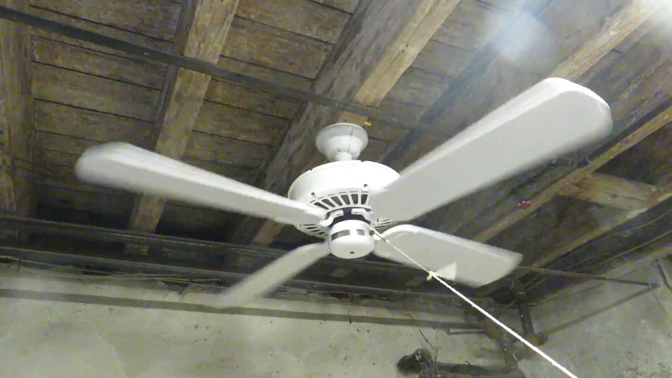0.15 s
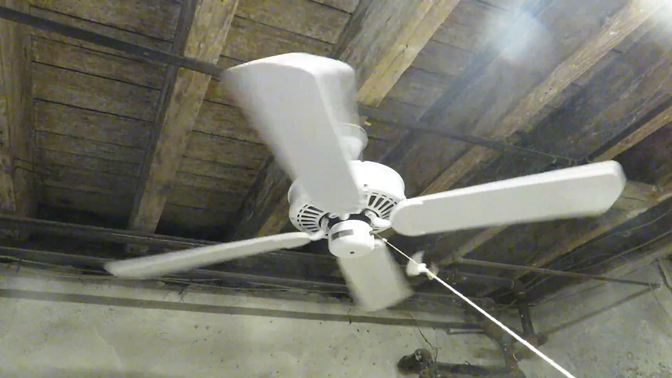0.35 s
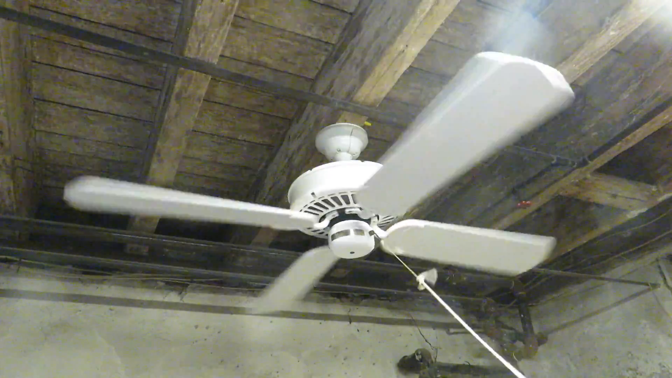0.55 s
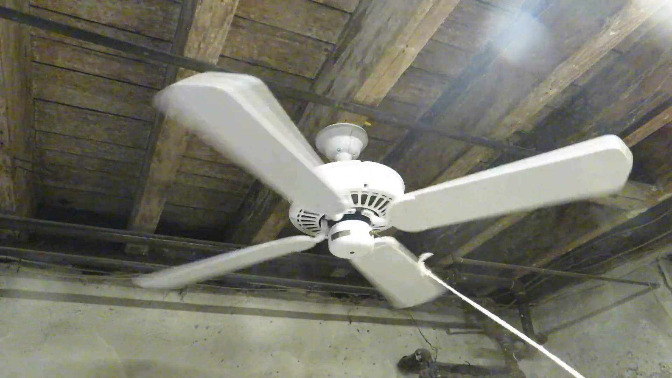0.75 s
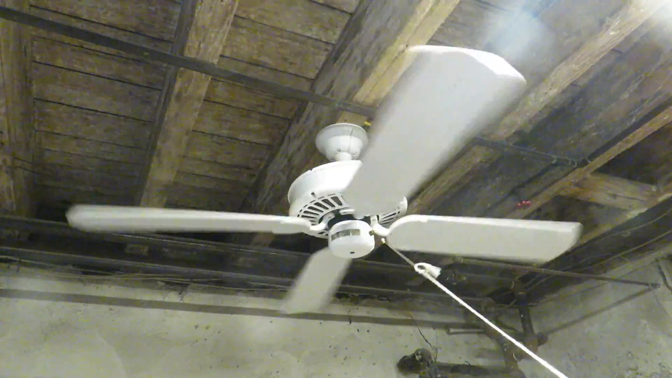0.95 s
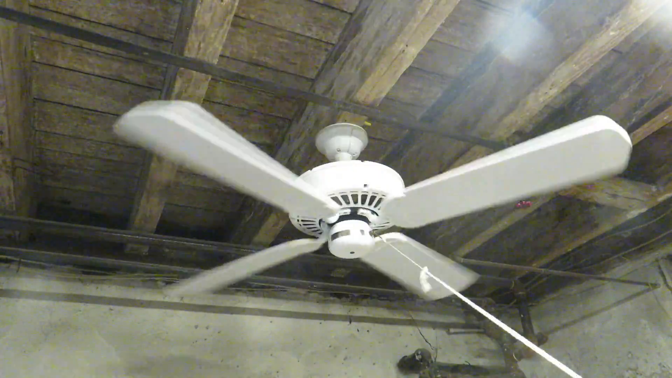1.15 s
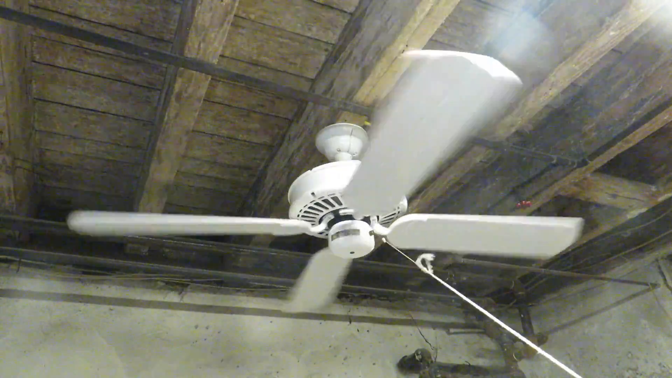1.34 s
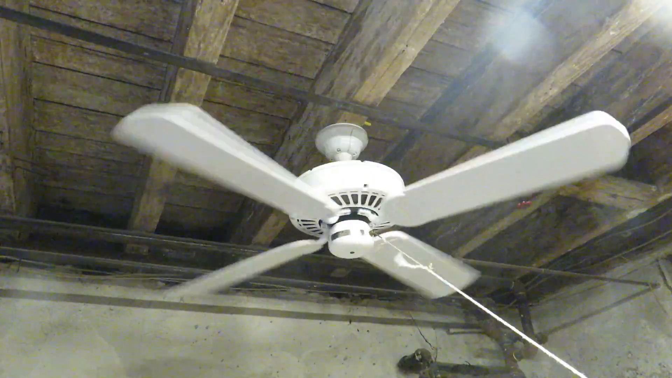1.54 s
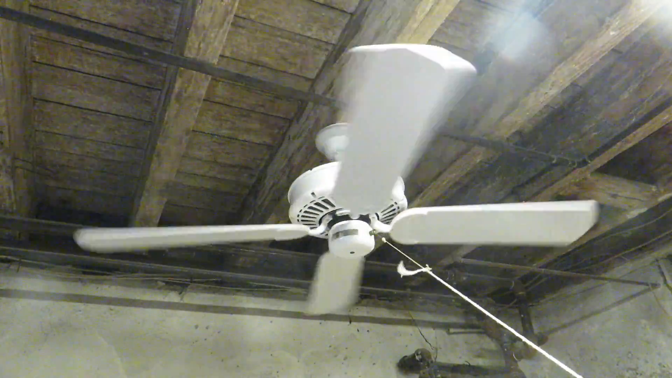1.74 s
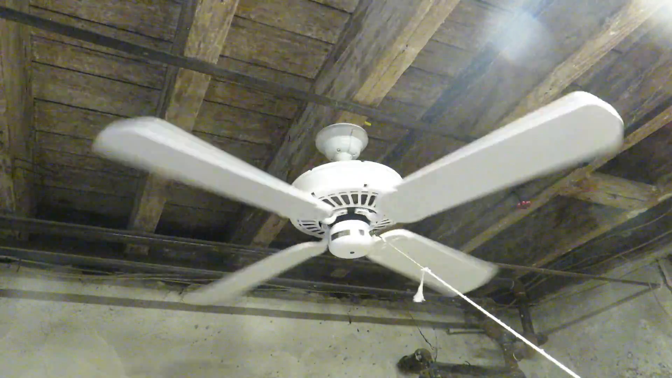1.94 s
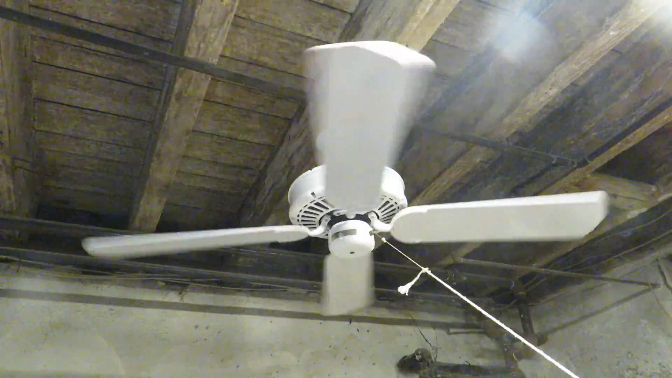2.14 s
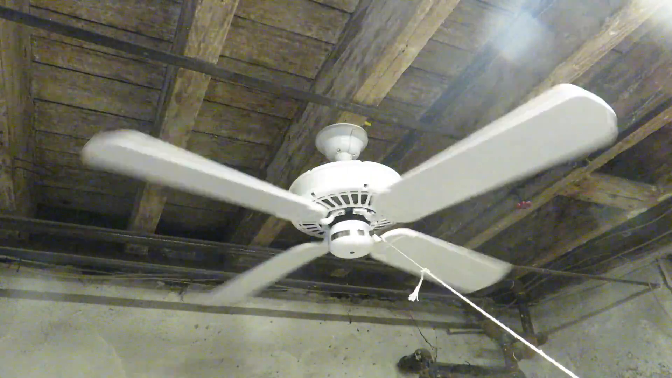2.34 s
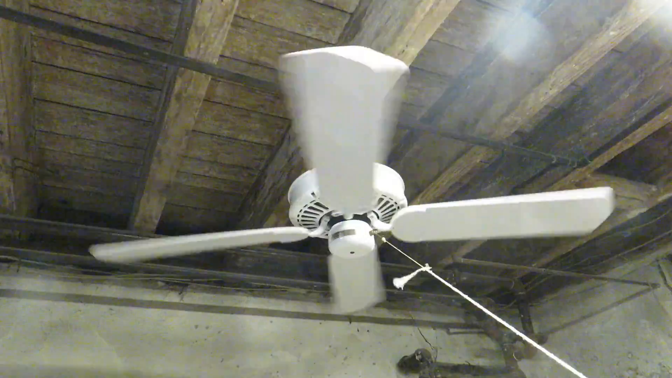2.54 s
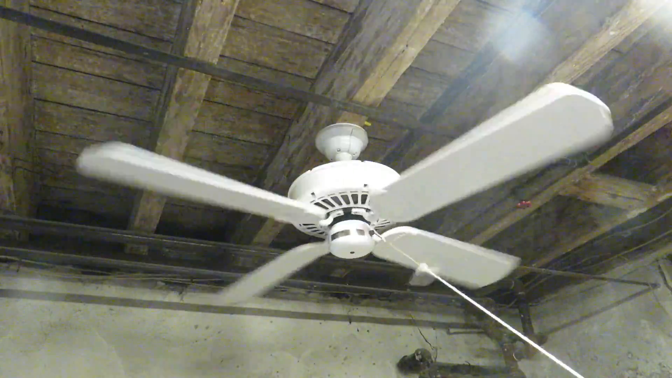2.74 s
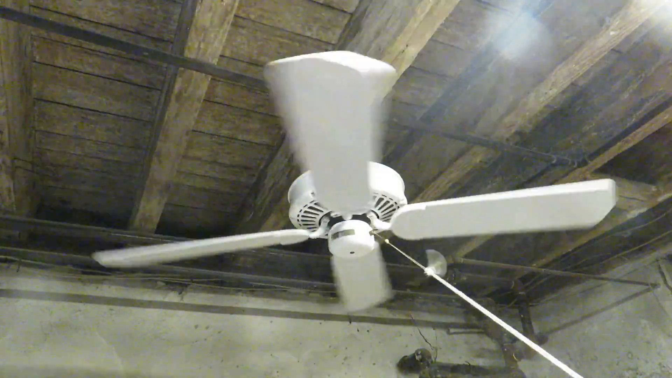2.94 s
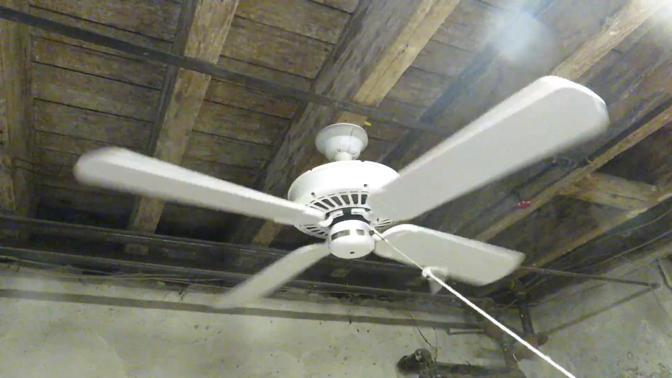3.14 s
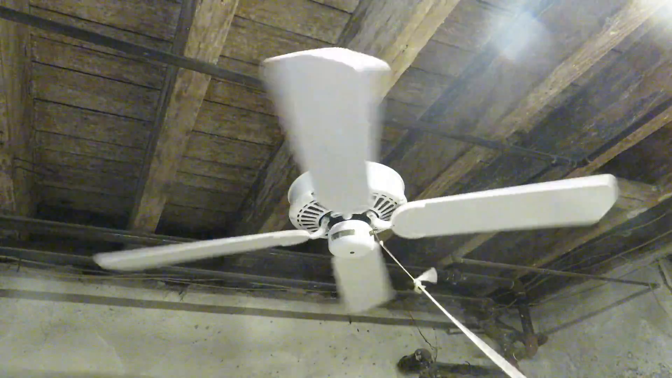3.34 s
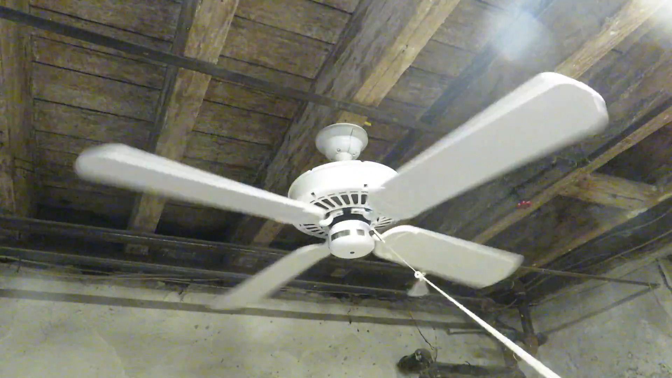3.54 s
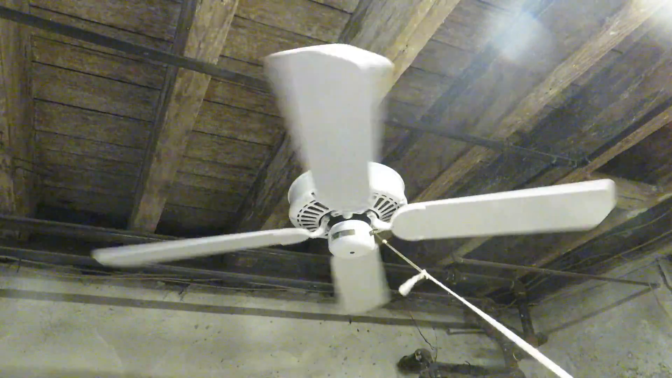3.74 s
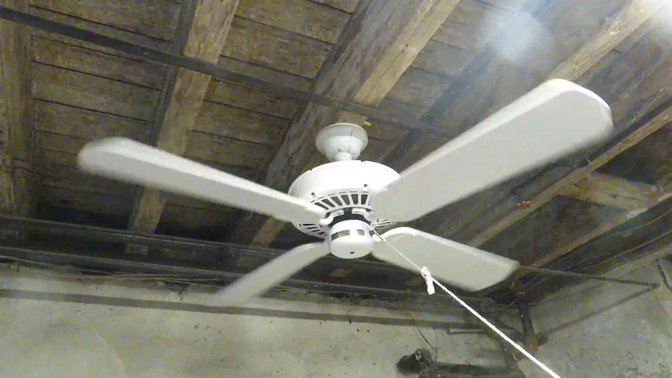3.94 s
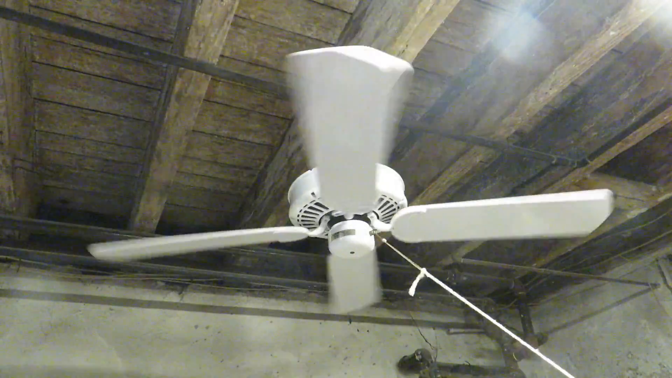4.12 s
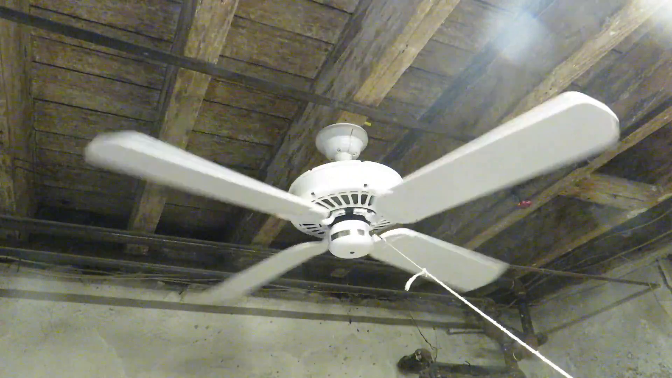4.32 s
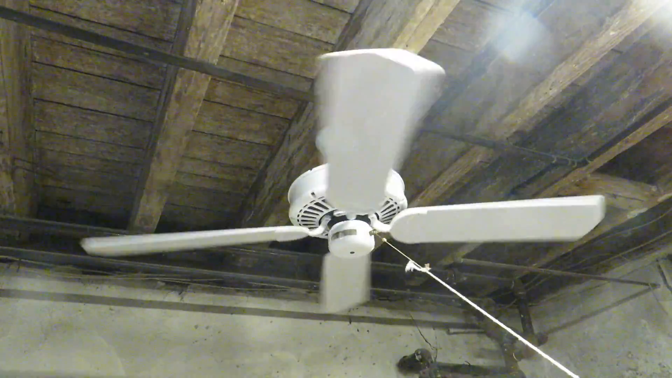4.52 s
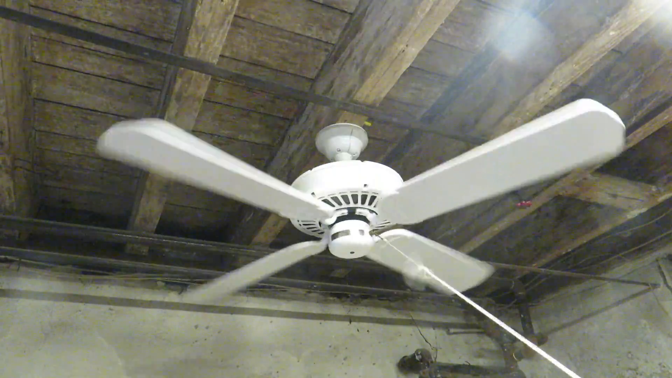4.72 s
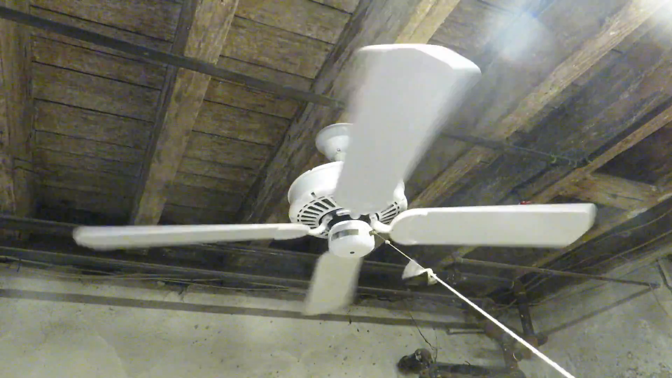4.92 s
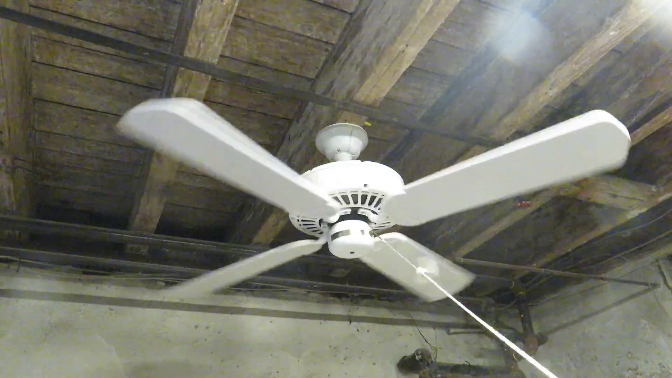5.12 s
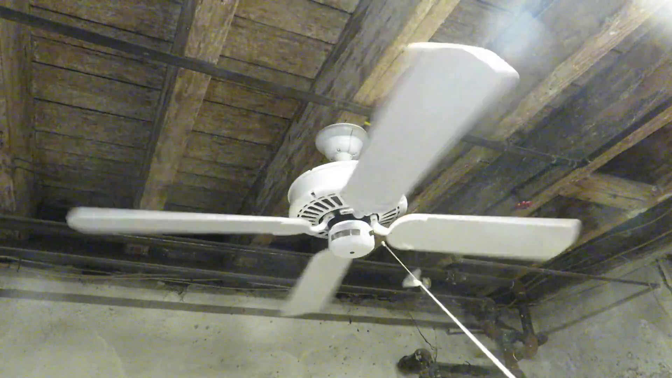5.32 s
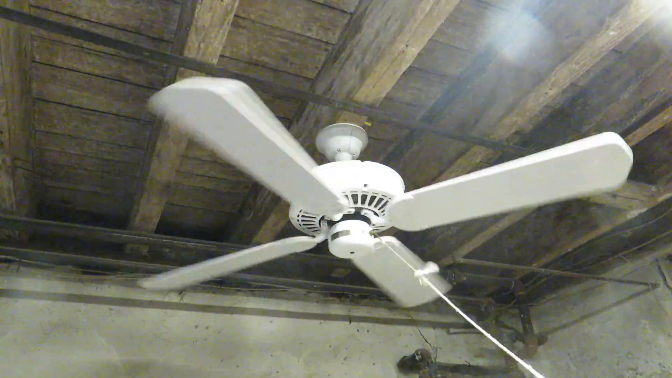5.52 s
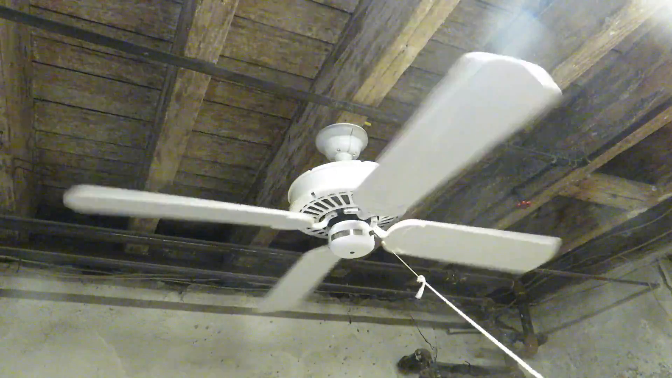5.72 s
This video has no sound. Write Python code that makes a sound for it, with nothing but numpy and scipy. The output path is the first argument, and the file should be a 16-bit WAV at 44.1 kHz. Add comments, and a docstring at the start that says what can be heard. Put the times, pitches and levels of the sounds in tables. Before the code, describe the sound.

A fan pull chain snaps loudly three times in a bare room, each snap answered by a smaller ticking click-back, with quiet rumble beneath.

```python
"""Three tugs on a ceiling fan's pull chain clack and jingle in a bare cellar room.
In each tug the chain goes taut, the switch snaps over, then the ratchet ticks back tooth by tooth.
Short noise bursts and damped notes make the blows; sums of fading sine tones make the parts ring.
Fading stereo noise makes the room's brief answer; shaped noise makes the rumble, hiss and chain rustle."""
import sys
import numpy as np
from scipy import signal
from scipy.fft import rfft, irfft
from scipy.io import wavfile
from scipy.ndimage import uniform_filter1d

SR = 44100
rng = np.random.default_rng(int(sys.argv[2]) if len(sys.argv) > 2 else 0)


def digitize_waveform(pressure):
    """Quantize a signal to 16-bit integers and store it at the path in sys.argv[1].

    Rows of a 2-D input are taken as channels; values are limited to [-1, 1].
    """
    field = np.atleast_2d(pressure).T
    bounded = np.clip(field, -1, 1)
    quanta = np.round(bounded * 32767).astype(np.int16)
    wavfile.write(sys.argv[1], SR, quanta)


N = 258867  # length in samples


def undb(db):
    """Turn a level in dB into a plain multiplier."""
    return 10 ** (np.asarray(db) / 20)


def read(table, hz):
    """Look up a (f/Hz, value) table, joining its points by lines on a log-frequency axis."""
    f, v = np.transpose(table)
    return np.interp(np.log(np.maximum(hz, 1)), np.log(f), v)


def colour(x, table):
    """Make each frequency louder or softer by a (f/Hz, level/dB) table."""
    hz = np.fft.rfftfreq(x.shape[-1], 1 / SR)
    return irfft(rfft(x) * undb(read(table, hz)), x.shape[-1])


def stereo_noise(size, likeness):
    """Make left and right noise by mixing a shared and an opposed part to set their likeness."""
    c = np.clip(read(likeness, np.fft.rfftfreq(size, 1 / SR)), -.99, .99)
    shares = np.sqrt([(1 + c) / 2, (1 - c) / 2])
    mid, side = rfft(rng.standard_normal((2, size))) * shares
    return irfft([mid + side, mid - side], size)


# how alike the two sides of the background are: (f/Hz, left-right correlation)
FLOOR_LIKENESS = [(60, 1), (130, 0.61), (290, -0.15), (640, -0.41), (1410, -0.047), (3100, 0.091),
                  (6820, -0.011), (15000, 0.27)]
# tone balance of rumble and hiss: (f/Hz, relative level/dB per Hz)
FLOOR_COLOUR = [(15, -3.5), (25, -8.5), (38, -21.5), (58, 0), (86, -9), (230, -9), (410, -9), (900, -13),
                (4670, -23), (9000, -31.5), (13900, -40.5), (16000, -52)]
FLOOR_DB = -53.5  # average level of the two sides mixed, before the swell


def floor():
    """Smooth hiss of the two microphones over a distant rumble; their shared level drifts a little."""
    noise = colour(stereo_noise(N, FLOOR_LIKENESS), FLOOR_COLOUR)
    k = SR // 4  # a new random level every quarter second, joined by slopes
    levels = np.repeat(rng.standard_normal(N // k + 1), k)
    swell = uniform_filter1d(levels, k)[:N]
    loudness = np.sqrt(np.mean(noise.mean(axis=0) ** 2))
    return noise / loudness * undb(FLOOR_DB + 0.45 * swell)


def fading_bursts(events):
    """Loudness curve of (t/s, level/dB, fade time/s) events: each starts at once and dies away."""
    t = np.arange(N) / SR
    return sum(undb(db) * (t > s) * np.exp(-np.abs(t - s) / fade) for s, db, fade in events)


# the slack chain sways: (t/s, level/dB before colouring, fade time/s)
RUSTLES = [(1.707, -54.5, 0.042), (1.873, -56, 0.016), (4.133, -56, 0.02)]
# tone balance of the rustling beads: (f/Hz, level/dB)
RUSTLE_COLOUR = [(600, -27), (1500, 8), (3000, 9), (6000, 0.5), (10000, -25)]


def slack_chain():
    """Soft bead noise between the tugs: each rustle starts at once and dies away."""
    return colour(fading_bursts(RUSTLES) * rng.standard_normal(N), RUSTLE_COLOUR)


# how long the room answers: (f/Hz, time to fall by 60 dB/s)
ECHO_T60 = [(300, 0.37), (1500, 0.29), (4000, 0.24), (8000, 0.18), (14000, 0.088)]
# how alike the two sides of the echo are: (f/Hz, left-right correlation)
ECHO_LIKENESS = [(300, 0.94), (1500, 1), (4000, 0.83), (8000, 0.36), (14000, 0.037)]


def echo():
    """Room response: noise dying away band by band, faster in the treble."""
    size = SR // 2
    t, f = np.arange(size) / SR, np.fft.rfftfreq(size, 1 / SR)
    spectrum, out = rfft(stereo_noise(size, ECHO_LIKENESS)), 0
    for hz in 125 * 2. ** np.arange(8):  # overlapping bands, one octave apart
        band = np.maximum(1 - np.abs(np.log2(np.maximum(f, 1) / hz)), 0)
        fade = undb(-60 * t / read(ECHO_T60, hz))
        out = out + irfft(spectrum * band, size) * fade
    return out * (1 - np.exp(-t / 0.0029))  # the echo builds up over a few milliseconds


SCATTER_DB = 2  # chance in how hard each tone is struck


def ring(modes, rise_s, smear_hz, lean_db):
    """A struck part's tones: the shock needs rise_s to spread, loose joints blur each by smear_hz."""
    t = np.arange(SR // 2) / SR
    hz, db, t60 = np.transpose(modes)[:, :, None]
    lean = lean_db * np.linspace(-.5, .5, len(modes))
    struck_db = lean + SCATTER_DB * rng.standard_normal(len(modes))
    gain = undb(db + struck_db[:, None]) / np.sum(undb(db))
    # a random walk in phase blurs the pitch
    steps = rng.standard_normal((len(modes), len(t)))
    slip = np.sqrt(2 * np.pi * abs(smear_hz) / SR) * np.cumsum(steps, axis=1)
    tones = np.sin(2 * np.pi * hz * t + slip) * undb(-60 * t / t60)
    return (1 - np.exp(-t / rise_s)) * np.sum(gain * tones, axis=0)


# starts of each pull and each release: (t/s)
PHASES_S = [0, .3, 2.8, 3.15, 4.75, 5.08]


def shake(force, modes, rise_s, smear_hz, leans_db=np.zeros(len(PHASES_S))):
    """A part rings under a force, a little differently in each pull and release."""
    out, edges = np.zeros(N + SR), [int(s * SR) for s in PHASES_S] + [N]
    for a, b, lean_db in zip(edges, edges[1:], leans_db):
        part = signal.fftconvolve(force[a:b], ring(modes, rise_s, smear_hz, lean_db))
        out[a:a + len(part)] += part
    return out[:N]


# tones of each part: (f/Hz, level/dB within the part, time to fall by 60 dB/s)
BEAMS = [(78.5, -7.5, 0.64), (98.3, -6, 0.66), (141.2, -3.5, 0.42), (185.7, -4.5, 0.29), (221, -2.5, 0.5)]
ROD = [(341.2, 4, 0.25)]
BLADES = [(271, -1, 0.24), (289, 10, 0.096), (302.7, 3, 0.18)]
HOUSING = [(757, -1.5, 0.15), (791.8, 3.5, 0.11), (816.4, 3.5, 0.16), (854.7, 0, 0.13), (932, -8.5, 0.092)]
CAP = [(559, -6.5, 0.16), (608, -5.5, 0.18), (660, 4.5, 0.1), (670, -0.5, 0.098), (697, 0, 0.16)]
CHAIN = [(4520, -2.5, 0.066), (5166, 6, 0.073), (5450, 4.5, 0.066), (6000, 0, 0.053), (6330, 1.5, 0.075),
         (6870, 10.5, 0.014), (7920, -2, 0.06), (10840, -15, 0.031), (10840, -3.5, .03), (13260, -3, 0.032)]
SWITCH = [(1321, -3, 0.061), (1620, -14, 0.043), (1884, 0, 0.16), (1956, 1.5, 0.11), (2110, 6, 0.039),
          (2300, -5, 0.071), (2640, -1, 0.042), (2887, 1.5, 0.085), (2880, -1, 0.082), (3220, -3, 0.09),
          (3454, 0, 0.13), (3460, -4, 0.11), (3640, -1.5, 0.096), (4180, 1.5, 0.071)]
# each pull and release strikes at its own angle, adding level from first to last tone:
# (housing level/dB, beams level/dB, blades level/dB)
LEANS = [(4, -4.5, 2.5), (12, -1, 5), (-3.5, 2, -3.5), (9, 2, 1), (0, 0, 5.5), (4, -2, -1)]
WOBBLE_DB, WOBBLE_S = 2, 0.018  # drift before its second smoothing, and smoothing time


def ringing_parts(tick, jingle, push):
    """Blows set the switch, chain, cap, motor housing, blades, beams and hanging rod ringing."""
    # loose parts touch the ringing switch, so its tones flutter; the chain shares the flutter
    flutter = 1 + 4.6 * uniform_filter1d(rng.standard_normal(N), size=64)
    # the shaken fan swings on its hanger, so the body tones come and go
    k = int(WOBBLE_S * SR)
    drift = uniform_filter1d(uniform_filter1d(rng.standard_normal((4, N)), k), k)
    wobble = undb(WOBBLE_DB * np.sqrt(k) * drift)
    housing_lean, beams_lean, blades_lean = np.transpose(LEANS)
    # after each part's tones: rise time (s), then blur (Hz)
    return (undb(7.5) * flutter * shake(tick, SWITCH, 0.001, 44.0)
            + undb(5.0) * flutter * shake(jingle, CHAIN, 0.00028, 126.0)
            + undb(4.0) * wobble[0] * shake(push[0], CAP, 0.0044, 5.)
            + undb(9.0) * wobble[1] * shake(push[1], HOUSING, 0.011, 3.5, housing_lean)
            + undb(6.5) * wobble[2] * shake(push[2], BLADES, 0.011, 2.0, blades_lean)
            + undb(8.5) * wobble[3] * shake(push[3], BEAMS, 0.047, 6.0, beams_lean)
            + undb(6.0) * shake(push[4], ROD, 0.044, 2.4))


# beads strike the guide tube: (t/s, level/dB before colouring)
GLINTS = [(0.0708, -21), (2.9190, -50), (4.8570, -43), (4.861, -16.5), (4.863, -24)]
# tone balance of these bright ticks: (f/Hz, level/dB)
GLINT_COLOUR = [(7000, -25), (10500, 3), (13000, 2), (16000, -20)]
GLINT_S = 0.00086  # fade time


def glints():
    """Very short bright noise ticks inside the pulls, as beads strike the guide tube."""
    burst = fading_bursts([(s, db, GLINT_S) for s, db in GLINTS])
    return colour(burst * rng.standard_normal(N), GLINT_COLOUR)


BOUNCE_DB, BOUNCE_S, BOUNCE_PER_S = -21.5, 0.022, 290  # chain beads: level, fade time, average rate
CLUMP_DB, CLUMP_S = 2.5, .0012  # uneven knots in the rattle: spread and size


def rattle_shock(t, length, noise, dice):
    """One metal rattle: uneven noise grains die away while chain beads chatter on at random."""
    sign, size, lump = noise
    bite = 1 - np.exp(-t / 0.0007)  # contact builds over a fraction of a millisecond
    knot = max(int(CLUMP_S * SR), 1)
    clumps = CLUMP_DB * np.sqrt(knot) * uniform_filter1d(lump, knot)
    grains = bite * sign * undb(2.0 * size + clumps) * np.exp(-t / max(length, 1 / SR))
    hits = (dice < BOUNCE_PER_S / SR) * np.sqrt(SR / BOUNCE_PER_S)
    beads = hits * sign * undb(BOUNCE_DB) * np.exp(-t / BOUNCE_S)
    return (grains + beads) / np.sqrt(np.sum(grains ** 2))


def pawl_clack(t, hz, t60):
    """The pawl itself: two heavily damped notes, the upper dying first."""
    bite = 1 - np.exp(-t / 0.0007)
    upper = 0.97 * np.exp(-t / 0.0027) * np.sin(2 * np.pi * hz * 1.144 * t)
    return undb(-60 * t / t60) * bite * (np.sin(2 * np.pi * hz * t) + upper)


# tone balance of the rattle: (f/Hz, level/dB)
SNAP_COLOUR = [(400, -7.5), (1000, -5), (2000, -24.5), (3200, -9), (7000, -1), (9000, -5.5), (13000, -3),
               (15500, -11)]
# steps of a tug, levels before mixing: (t/s, click level/dB, clack f/Hz, clack level/dB,
# then push level/dB on chain, motor housing, switch cap, blades, hanging rod)
TAUT = [(0.003, -42.5, 3500, -55, -46, -36, -46, -44, -50),
        (2.8440, -49, 2770, -48, -40, -40, -47, -42.5, -58),
        (2.8488, -33.5, 2870, -41.5, -40, -33.5, -39, -40, -51),
        (4.7946, -36, 3450, -37, -35.5, -32, -32, -35, -53)]
SNAPS = [(0.0687, -20.5, 2860, -32.5, -25.5, -43, -50, -30, -40),
         (0.0708, -23, 3330, -44, -26, -26, -35, -40, -42),
         (2.9171, -16.5, 2850, -29, -24.5, -49, -27.5, -32, -52),
         (2.9215, -33, 3430, -42, -31, -61, -47, -49, -52),
         (4.8550, -18, 2820, -26.5, -23, -33, -55, -27.5, -30)]
JOLTS = [(0.0792, -28, 3040, -21.5, -35, -41, -19, -25.5, -32.5),
         (2.9267, -19.5, 3540, -30, -50, -20, -43, -22, -34),
         (4.8615, -16, 2880, -19, -23, -18.5, -25, -18, -28)]
TICKS = [(0.3592, -31.5, 3510, -44.5, -54, -38.5, -63, -43, -46),
         (0.4010, -25.5, 3400, -40, -53, -29, -63, -49, -50),
         (0.4160, -32, 3740, -46, -46, -59, -53, -53, -48),
         (3.1908, -32.5, 3590, -47.5, -42, -36, -52, -39, -50),
         (3.2252, -24.5, 3500, -46, -37, -43, -44, -45, -50),
         (3.2365, -27, 3510, -35, -45, -35, -62, -49, -55),
         (5.1086, -33, 3540, -44, -36, -40, -45, -45, -49),
         (5.1560, -36, 3585, -43.5, -43, -38, -57, -54, -55),
         (5.1446, -24.5, 3490, -41, -31, -33.5, -51, -45, -50)]
HOMES = [(0.4258, -25, 3030, -13, -27.5, -33, -28, -35, -42.5),
         (3.2459, -29.5, 3010, -15, -26, -26, -22, -44, -35),
         (5.1661, -22.5, 2980, -23, -25.5, -21, -30.5, -44, -51)]
REBOUNDS = [(0.0820, -30, 3510, -23.5, -32, -25.5, -44, -34.5, -50),
            (0.4283, -29.5, 2990, -22, -35, -62, -42, -48, -58),
            (0.4440, -34, 3340, -26.5, -41, -43, -46, -46, -55),
            (3.2483, -24, 2900, -28, -46, -41.5, -43, -48, -49),
            (5.1690, -30, 2970, -21.5, -28, -50, -51, -37, -47)]
# chain goes taut, switch snaps over, pull hits its stop and shakes the fan,
# ratchet slips back tooth by tooth, pawl drops home, some blows bounce:
# (rows, rattle fade time/s, clack time to fall by 60 dB/s, switch and beams level/dB relative to click)
STAGES = [(TAUT, 0.0016, 0.028, -4.5, -6), (SNAPS, 0.0031, 0.022, -12, -26.5),
          (JOLTS, 0.0018, 0.0072, -4.5, -22), (TICKS, 0.0059, 0.06, -7, -17.5),
          (HOMES, 0.0012, 0.0076, -10, -28), (REBOUNDS, 0.0011, 0.012, -2.4, -45)]
# extra shake of the beams by each jolt: (level/dB)
CEILING_DB = [-33, -42, -41]


def pull_chain():
    """Every blow clacks, rattles metal on metal and pushes the parts of the fan and the ceiling."""
    t = np.arange(SR // 10) / SR
    rattle, clack, tick, jingle = np.zeros((4, N + len(t)))
    push = np.zeros((5, N))  # cap, housing, blades, beams, rod
    for rows, length, t60, switch_db, beams_db in STAGES:
        for s, db, hz, clack_db, chain_db, housing_db, cap_db, blades_db, rod_db in rows:
            i = int(s * SR)
            shock = rattle_shock(t, length, rng.standard_normal((3, len(t))), rng.random(len(t)))
            rattle[i:i + len(t)] += undb(db) * shock * np.sqrt(max(length, 1 / SR) * SR / 2)
            tick[i:i + len(t)] += undb(db + switch_db) * shock
            jingle[i:i + len(t)] += undb(chain_db) * shock
            clack[i:i + len(t)] += undb(clack_db) * pawl_clack(t, hz, t60)
            push[:, i] += undb([cap_db, housing_db, blades_db, db + beams_db, rod_db])
    for jolt, db in zip(JOLTS, CEILING_DB):
        push[3, int(jolt[0] * SR)] += undb(db)
    rings = ringing_parts(tick, jingle, push)
    return undb(-5.0) * colour(rattle, SNAP_COLOUR)[:N], undb(5.0) * clack[:N], rings


def scene():
    """Direct blows in the middle, their echo wider, the floor beneath."""
    snap, clack, rings = pull_chain()
    snap = snap + glints()
    sent = undb(-22.5) * snap + undb(-33.5) * clack + undb(-36.0) * rings
    wet = signal.fftconvolve(sent[None], echo())[:, :N]
    return snap + clack + rings + wet + slack_chain() + floor()


def record(dry):
    """The recorder cuts the top with a steep low-pass filter at 15900 Hz."""
    low_pass = signal.ellip(8, .2, 70, 15900, fs=SR, output="sos")
    return signal.sosfilt(low_pass, dry)


dry = scene()
out = record(dry)
digitize_waveform(out)
```